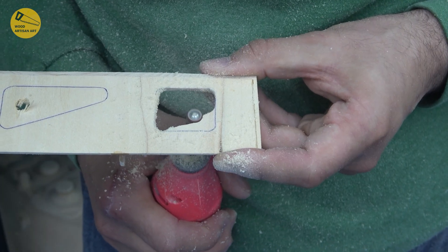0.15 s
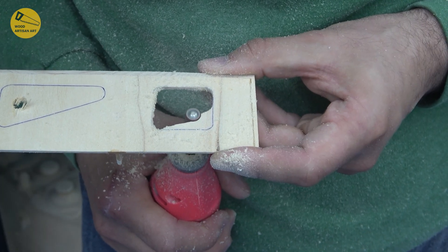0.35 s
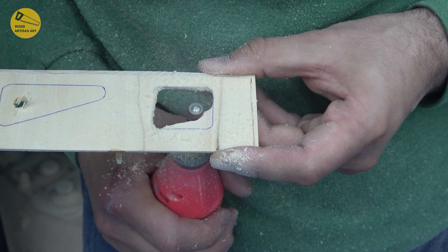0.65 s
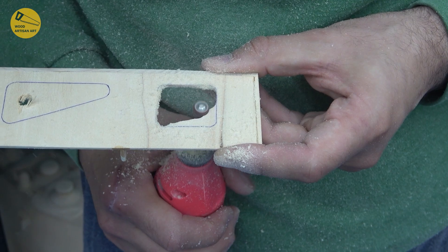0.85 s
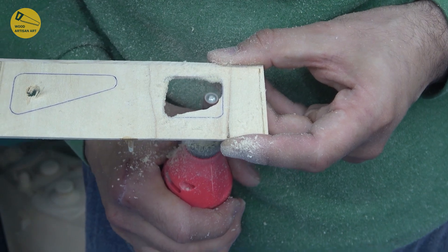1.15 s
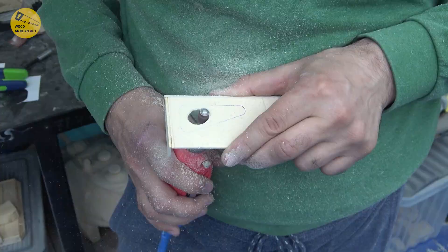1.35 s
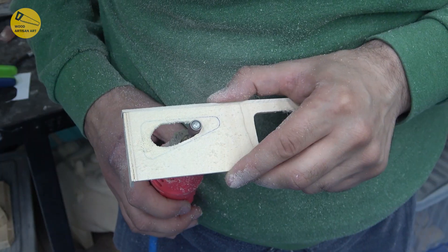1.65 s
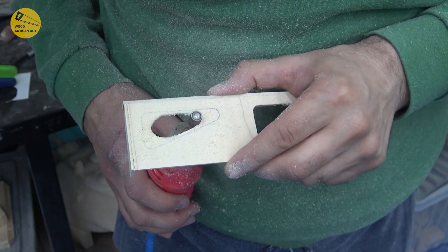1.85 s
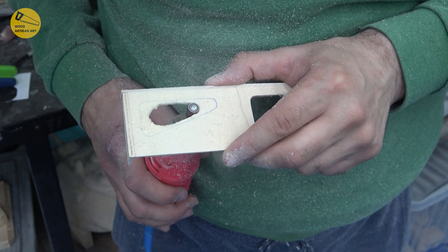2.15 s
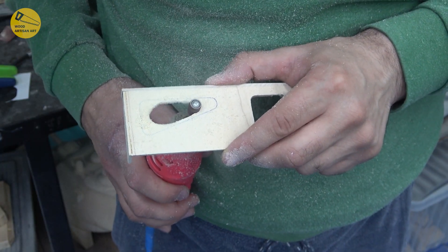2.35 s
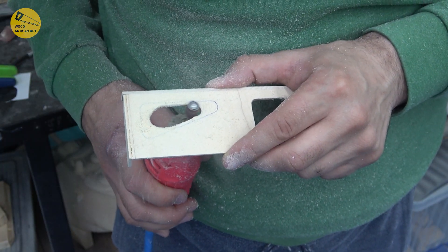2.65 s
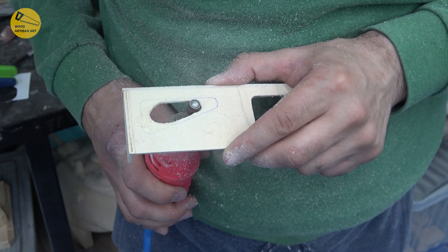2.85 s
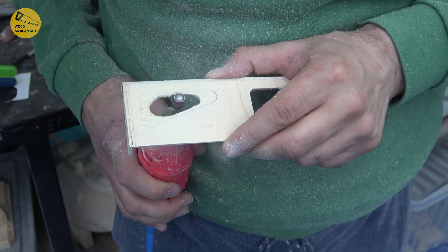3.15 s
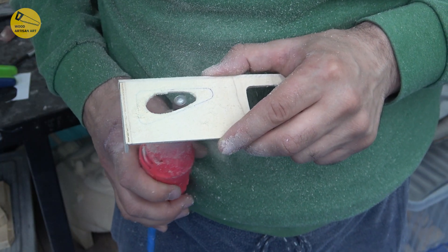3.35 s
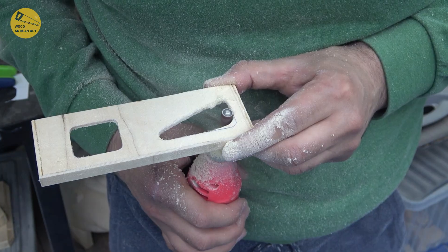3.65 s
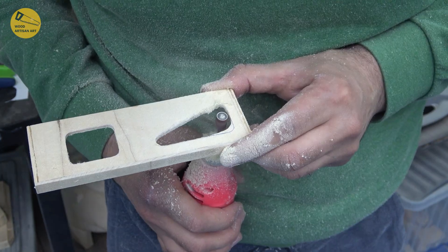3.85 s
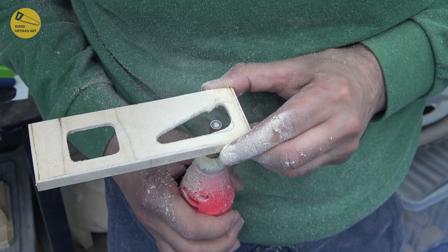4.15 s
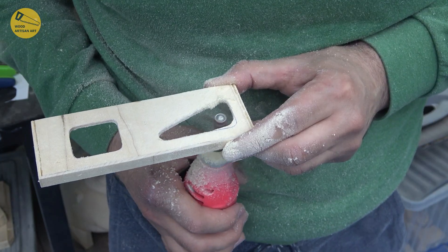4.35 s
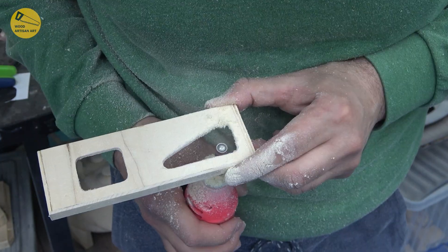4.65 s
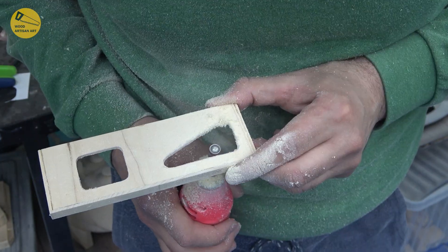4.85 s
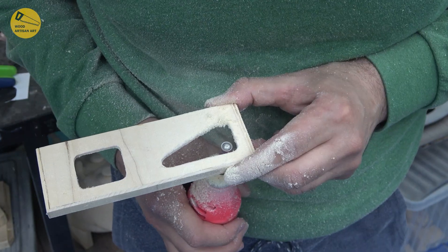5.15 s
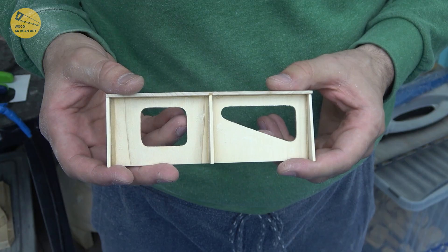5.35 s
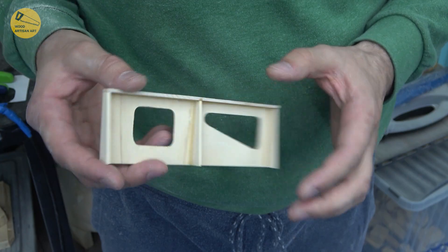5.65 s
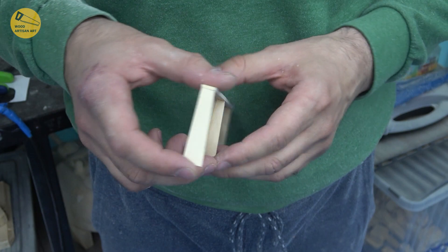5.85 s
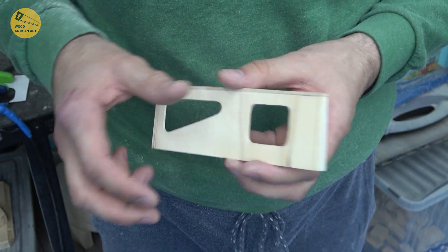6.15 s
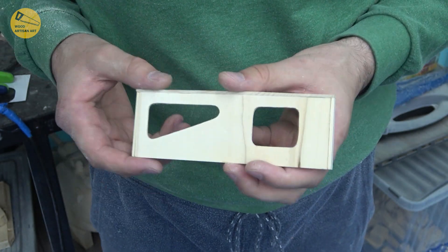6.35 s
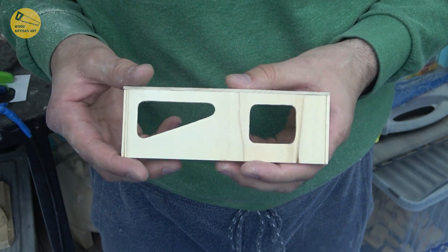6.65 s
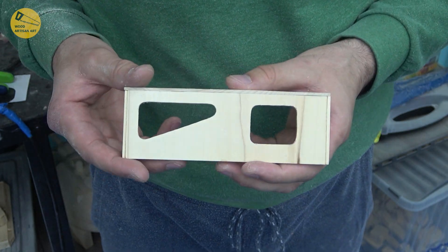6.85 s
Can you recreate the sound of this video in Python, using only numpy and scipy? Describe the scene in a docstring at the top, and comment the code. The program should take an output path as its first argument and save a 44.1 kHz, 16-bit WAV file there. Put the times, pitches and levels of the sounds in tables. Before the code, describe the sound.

Close up, a handheld rotary tool with a small sanding drum grinds the edges of cutouts in thin plywood. The motor whines high and buzzy, sagging when pressed and rising when eased, while grit rasps and the plate chatters and sings. Work jumps abruptly between stretches. Past five seconds it cuts off, leaving quiet workshop air and soft dry finger rustles on hollow wood.

```python
"""A handheld rotary tool runs a small sanding drum round the cutouts of a thin plywood part, in five stretches
that follow abruptly. The motor whines at eight times its speed, chopped by the speed control, and slows under
load; the drum rasps as grit tears fibres, and its bumps chatter on the edge and now and then set the plate singing.
Then the tool is gone, and fingers turn the part over: dry skin slips and the hollow wood rings.
Behind it lies a quiet workshop: a low wash of air, a faint hum and a swelling drone."""
import sys
import numpy as np
from scipy import signal
from scipy.fft import irfft
from scipy.io import wavfile
from scipy.ndimage import map_coordinates

SR = 44100
rng = np.random.default_rng(int(sys.argv[2]) if len(sys.argv) > 2 else 0)


def generate_wav(signal):
    """Clip the signal to [-1, 1] and save it as 16-bit WAV at the path in sys.argv[1]."""
    frames = np.transpose(np.atleast_2d(signal))
    scaled = np.clip(frames, -1, 1) * 32767
    pcm = np.round(scaled).astype(np.int16)
    wavfile.write(sys.argv[1], SR, pcm)


N = 308259
TIME = np.arange(N) / SR   # s
SLOTS, CHOP_HZ = 8, 100   # armature slots; bursts of current per second
FLARE_RISE_S, FLARE_FALL_S = 0.038, 0.013
SING_RISE_S, SING_FALL_S = 0.046, .06
# The stretches of work. Each row: start in seconds, motor whine in dB, shaking of the plate in dB, rasp in dB,
# pitch of the gripped housing in Hz, its width in Hz, housing growl in dB, twitching of the chatter in dB.
STRETCH_ROWS = [(0, -29, 1.5, -1.5, 2550, 204, -1.5, 1.5), (1.434, -44.5, -2, 0, 2560, 300, 3.5, 0.5),
                (1.521, -31, 2.5, 0.5, 2635, 282, -2, 1.3), (3.514, -29, -1, 1, 2603, 227, 0, 2),
                (4.471, -32, -3.5, 1, 2526, 116, 0.5, 0.7)]


def from_db(db):
    """Decibels to gain."""
    return 10 ** (np.asarray(db) / 20)


def rms_one(x):
    """Scale to unit rms."""
    return x / np.sqrt(np.mean(np.abs(x) ** 2) + 1e-20)


def in_time(rows, at=TIME):
    """Each column of a curve, joined by straight lines."""
    s, *columns = np.transpose(rows)
    return [np.interp(at, s, c) for c in columns]


def at_hz(points, hz):
    """Read a spectrum on a log-frequency axis."""
    point_hz, point_db = np.array(points).T
    return np.interp(np.log(hz), np.log(point_hz), point_db)


def held(start, end, rise_s, fall_s, at=TIME):
    """Rise, hold and fall, from 0 to 1 and back."""
    rise = np.clip((at - start) / rise_s + .5, 0, 1)
    fall = np.clip((end - at) / fall_s + .5, 0, 1)
    return rise * fall


def wander(rate, per_s, shape):
    """Smooth chance of spread 1 along the last axis, sampled per_s times a second; rate in Hz."""
    r = np.exp(-2 * np.pi * rate / per_s)
    settling = 600   # samples dropped while the filter settles
    white = rng.standard_normal(shape[:-1] + (shape[-1] + settling,))
    return rms_one(signal.lfilter([1], [1, -2 * r, r * r], white)[..., settling:])


def drift(rate):
    """Smooth chance at every sample, drawn at every 40th and joined by lines."""
    slow = wander(rate, SR / 40, (N // 40 + 2,))
    return np.interp(np.arange(N) / 40, np.arange(len(slow)), slow)


def resonate(x, hz, width_hz):
    """A resonance with gain 1 on top."""
    r = np.exp(-np.pi * width_hz / SR)
    zeros = np.array([1, 0, -1]) * (1 - r * r) / 2
    return signal.lfilter(zeros, [1, -2 * r * np.cos(2 * np.pi * hz / SR), r * r], x)


def noise_bands(spectrum, alike, grain_db):
    """Yields (Hz, stereo band) of grainy noise; 0 dB in the spectrum is the density of unit white noise."""
    grains = rms_one(from_db(grain_db * rng.standard_normal((2, 1, N))))
    white = rng.standard_normal((2, 3, N)) * grains   # two sets, for alternate bands: left, right, common
    edges = np.geomspace(30, 16000, 23)
    for k, (low, high) in enumerate(zip(edges, edges[1:])):
        hz = np.sqrt(low * high)
        shared = np.clip(alike / (1 + hz / 1000), 0, 1)   # the two sides agree most in the bass
        source = np.sqrt(shared) * white[k % 2, 2] + np.sqrt(1 - shared) * white[k % 2, :2]
        band_pass = signal.butter(2, [low, high], "band", fs=SR, output="sos")
        yield hz, from_db(at_hz(spectrum, hz)) * signal.sosfilt(band_pass, source)


def reflections(x, t60, echo_db):
    """Direct sound plus dense early echoes from hands, part and bench, different on each side."""
    t = np.arange(SR // 12) / SR
    echoes = rng.standard_normal((2, len(t))) * from_db(-60 * t / t60) * (t > .001)
    echoes *= from_db(echo_db) / np.sqrt(np.sum(echoes ** 2, axis=1, keepdims=True))
    echoes[:, 0] = 1   # the direct sound
    return signal.fftconvolve(np.atleast_2d(x), echoes, axes=1)[:, :N]


def workshop(room_db=3.5, hum_db=3.0, waver_rad_per_hz=.0025):
    """A low wash of air with a faint wavering hum and a hollow drone that swells now and then."""
    # Each row: time in seconds, level of the air in dB before room_db is added.
    air_level = [(5.3, -72), (5.55, -69), (5.8, -68.5), (5.9, -67), (6.2, -67.5), (6.45, -65.5),
                 (6.6, -67.5), (6.99, -69)]
    # Colour of the air. Each row: frequency in Hz, relative density in dB per Hz.
    air_colour = [(30, -10.5), (65, -6), (110, -7.5), (213, -11), (330, -16.5), (440, -8.5), (560, -14.5),
                  (720, -5.5), (900, -13.5), (1400, -24.5), (2600, -25), (4300, -32), (6200, -24),
                  (13300, -31), (15500, -28)]
    # Each row: hum frequency in Hz, level in dB before hum_db is added.
    hum_tones = [(70, -84), (140, -88), (377, -82), (700, -79), (845, -79)]
    # Each row: start in seconds, end in seconds, drone level in dB.
    drone_swells = [(5.28, 5.406, -75), (5.551, 5.69, -73.5), (5.85, 5.95, -70), (6.329, 6.509, -67)]
    drone_hz, drone_width_hz, drone_fade_s = 687, 75, .04

    bands = noise_bands(air_colour, alike=0.13, grain_db=-2.0)
    air = rms_one(sum(band * from_db(1.3 * drift(6.5)) for hz, band in bands))
    air = air * from_db(in_time(air_level)[0] + room_db)
    hum = 0
    for hz, db in hum_tones:
        phase = 2 * np.pi * hz * TIME + waver_rad_per_hz * hz * drift(5)
        hum = hum + from_db(db + hum_db + 2 * drift(3.3)) * np.sin(phase)
    drone = resonate(rng.standard_normal((2, N)), drone_hz, drone_width_hz)
    drone = rms_one(resonate(drone, drone_hz, drone_width_hz))
    swell = sum(from_db(db) * held(start, end, drone_fade_s, drone_fade_s) for start, end, db in drone_swells)
    return air + hum + drone * swell


def fingers(stick_db=-0.5, stick_rate=110, slips_per_s=900, slip_db=2.0, smooth=0.6):
    """Dry skin catches and slips on dusty wood; the slips ring in the hollow part, its thin walls a little."""
    # Each row: start in seconds, end in seconds, rustle of the skin in dB, ring of the wood in dB.
    strokes_made = [(5.845, 5.905, -62, -76), (6.018, 6.067, -66.5, -69.5), (6.093, 6.16, -74, -70),
                    (6.17, 6.233, -74.5, -75), (6.33, 6.39, -90.5, -83), (6.451, 6.497, -75, -74)]
    # Colour of the brushing skin. Each row: frequency in Hz, relative density in dB per Hz.
    skin_colour = [(1200, -26.5), (1900, -10), (3000, 0), (4500, 0), (7000, 1.5), (11000, -5.5),
                   (15000, -18)]
    # Hollow of the part. Each row: frequency in Hz, relative level in dB.
    hollow_modes = [(2500, -7), (4650, 0), (5400, 0), (6850, 3), (8300, 1), (10450, 3), (11300, -6)]
    # Thin walls. Each row: frequency in Hz, width in Hz, relative level in dB.
    wall_modes = [(1980, 150, 12), (3100, 290, -3), (4680, 130, -10)]
    hollow_width_hz = 310
    rise_s, fall_s = 0.026, 0.049
    holding_db = -80   # fingers that only hold the part rustle faintly too

    hiss = rms_one(sum(band for hz, band in noise_bands(skin_colour, alike=0.36, grain_db=3.0)))
    slip_sizes = rng.choice([-1, 1], N) * from_db(slip_db * rng.standard_normal(N))
    slips = (rng.random(N) < slips_per_s / SR) * slip_sizes
    hollow = sum(from_db(db) * resonate(slips, hz, hollow_width_hz) for hz, db in hollow_modes)
    hollow = rms_one(reflections(hollow, t60=.02, echo_db=3.0))
    rustle = rms_one(hollow + smooth * hiss) * from_db(stick_db * drift(stick_rate))
    ring = rms_one(sum(from_db(db) * resonate(hiss, hz, width_hz) for hz, width_hz, db in wall_modes))
    strokes = 0
    for start, end, rustle_db, ring_db in strokes_made:
        stroke = from_db(rustle_db) * rustle + from_db(ring_db) * ring
        strokes = strokes + stroke * held(start, end, rise_s, fall_s)
    return strokes + from_db(holding_db) * hiss


def joint_thumps(width_hz=260):
    """A soft low thump where one stretch gives way to the next: an impulse through two broad resonances."""
    # Each row: time in seconds, strength in dB, pitch in Hz.
    thumps = [(1.434, -48, 105)]
    out = 0
    for s, db, hz in thumps:
        impulse = from_db(db) * (np.arange(N) == int(s * SR)) + 1e-18   # the tiny offset keeps the filters quick
        out = out + resonate(resonate(impulse, hz, width_hz), hz, width_hz) * SR / width_hz
    return out


def stretch_at(at=TIME):
    """Number of the stretch of work at each moment."""
    return np.searchsorted([row[0] for row in STRETCH_ROWS[1:]], at)


def of_stretch(column, at=TIME):
    """One column of the stretches of work, at each moment."""
    return np.array(STRETCH_ROWS)[stretch_at(at), column]


def spindle_speed(at=TIME):
    """Turns per second, sagging under load and jumping from one stretch of work to the next."""
    # One curve for each stretch. Each row: time in seconds, speed in turns per second.
    square = [(0, 298), (.04, 308.5), (.12, 311), (.28, 309.4), (.48, 305), (.5, 310), (.632, 316),
              (.74, 314.5), (1.22, 296.6), (1.42, 294.2)]
    hard_push = [(1.434, 266.6)]
    wedge = [(1.526, 368.4), (1.887, 374.3), (2.007, 364.8), (2.191, 344.3), (2.555, 289.5), (2.62, 288.9),
             (2.711, 301.3), (2.832, 307.2), (3.189, 314.6), (3.256, 320.9), (3.3, 329.3), (3.383, 332.8),
             (3.512, 331.8)]
    corner = [(3.517, 326.6), (3.592, 329), (3.742, 335.5), (3.8, 336.4), (4.078, 343), (4.249, 349.5),
              (4.31, 344.8), (4.386, 325.9), (4.41, 323), (4.466, 325.7)]
    finish = [(4.466, 328.5), (4.792, 326.4), (5.046, 330.3), (5.128, 330), (5.26, 329.9)]
    curves = [in_time(c, at)[0] for c in (square, hard_push, wedge, corner, finish)]
    return np.choose(stretch_at(at), curves)


def contact(at=TIME):
    """How the drum meets the wood: force, bouncing and brightness, all in dB."""
    # Each row: start in seconds, end in seconds, force in dB above a graze, brightness in dB.
    presses = [(0.06, 0.483, 9, -0.5), (0.55, 1.432, 11.5, 2), (1.435, 1.503, 8, 10),
               (1.497, 1.854, 9.5, 3), (1.864, 2.687, 11, 6.5), (2.68, 3.23, 4.5, 4),
               (3.284, 3.517, 10, -2), (3.52, 4.22, 8.5, -3.5), (4.209, 4.42, 6.5, 9),
               (4.463, 5.306, 4, 4.5)]
    # Each row: start in seconds, end in seconds, rise of the chatter in dB as the drum bounces on the edge.
    bounces = [(0.573, 0.764, 0.5), (2.679, 3.235, 8.5), (3.298, 3.525, 7), (3.583, 3.666, 5),
               (3.73, 3.802, 7.5), (3.856, 3.923, 7), (3.987, 4.043, 5.5), (4.227, 4.31, 6.5),
               (4.326, 4.423, 7), (4.461, 5.303, 6.5)]
    press_rise_s, press_fall_s = 0.031, 0.059
    bounce_rise_s, bounce_fall_s = 0.011, 0.042
    graze_bright_db = -0.5   # brightness of the barely touching drum

    force_db, bright_db = 0, graze_bright_db
    for start, end, press_db, press_bright_db in presses:
        pressing = held(start, end, press_rise_s, press_fall_s, at)
        force_db = force_db + press_db * pressing
        bright_db = bright_db + (press_bright_db - graze_bright_db) * pressing
    bounce_db = sum(db * held(start, end, bounce_rise_s, bounce_fall_s, at) for start, end, db in bounces)
    return force_db, bounce_db, bright_db


def digging(at=TIME):
    """How deep the drum digs in, from 0 to 1: the shaft judders and the motor's brush noise rises."""
    return held(1.93, 2.64, rise_s=.25, fall_s=.08, at=at)


def rasp(turns, rasp_db=1.5, beat=0.24, patchy_db=2.0, skipping=0.14):
    """Grit tears fibres in dense grains, harder on the high side of the drum."""
    # Colour of the tearing. Each row: frequency in Hz, relative density in dB per Hz.
    tearing_colour = [(60, -47), (150, -17.5), (260, -14), (400, -11.5), (550, -5.5), (760, 0), (1100, 3),
                      (1600, 0), (2500, 0), (3600, 4), (5500, -2), (8500, -1), (13000, -9), (15500, -22)]
    graze_db = -42.5   # barely touching drum, before the trims below
    plate_hz, plate_width_hz, plate_db = 6550, 1100, -2.5   # a bright ring of the plate under the rasp
    body_db, loss_per_force, loss_per_bounce = 6.5, 0.73, 0.28   # dB; dB per dB

    force_db, bounce_db, bright_db = contact()
    # the low rasp gives way to force and to bouncing
    body = from_db(body_db - loss_per_force * force_db - loss_per_bounce * bounce_db)
    bright = from_db(bright_db)
    out = 0
    for hz, band in noise_bands(tearing_colour, alike=0.24, grain_db=2.5):
        zone = body if hz < 2000 else bright if hz > 9000 else 1
        out = out + band * zone * from_db(patchy_db * drift(13.0))
    out = out + from_db(plate_db) * resonate(out, plate_hz, plate_width_hz)
    level_db = graze_db + of_stretch(3) + force_db + rasp_db
    level_db = level_db - skipping * bounce_db   # a bouncing drum spends less time in the wood
    return out * from_db(level_db) * (1 + beat * np.cos(2 * np.pi * turns))


def plate_singing(size, roughness, spread, hz, when):
    """The plate catches the multiple nearest one of its own pitches and sings; changes the arrays in place."""
    # Each row: start in seconds, end in seconds, pitch in Hz, level in dB before twitching,
    # roughness 0-1, swell from ends to middle in dB.
    songs = [(0.0949, 0.29, 1550, -41, 0.8, 1), (.06, 0.36, 3100, -37.5, 0.4, 0.5),
             (.56, 0.777, 1580, -34, 0.5, 0), (.62, 0.72, 1890, -32.5, .3, 5),
             (0.62, 0.82, 3790, -39, 0.3, 3.5), (1.04, 1.5, 3280, -39, 0.53, -6),
             (1.16, 1.425, 2950, -34.5, 0.2, -2), (1.23, 1.5, 580, -42.5, 0, 5),
             (0.94, 1.43, 300, -58, 0.4, -1), (1.56, 2.3, 370, -46.5, 0.8, 5),
             (1.51, 2.15, 740, -41.5, 0.35, -2.5), (1.83, 2.05, 1110, -35, 0.51, 9),
             (1.9, 2.167, 2200, -35.5, 0.94, -4), (1.68, 1.9, 3700, -39.5, 0.3, -3),
             (1.5, 1.8, 5530, -42, 0.1, 3), (2.15, 2.25, 2050, -37.5, 0.85, -1),
             (2.14, 2.4, 2300, -38, 0.9, 3), (2.23, 2.47, 950, -33.5, 0.61, 2.5),
             (2.43, 2.66, 290, -53, 0.85, 4), (1.9, 3.2, 590, -50.5, 0.3, -3),
             (2.44, 2.6, 2080, -37.5, 0.76, -1), (2.9, 3.235, 930, -36, 0.07, -4),
             (2.745, 3.18, 2170, -26.5, 0.4, 10), (2.9, 3.04, 3410, -34, .4, 3),
             (3.0, 3.13, 3120, -33, .4, 6), (3.03, 3.14, 3750, -32, 0.3, 3),
             (2.94, 3.11, 4990, -33.5, 0.3, 3.5), (3.31, 3.48, 6640, -35, .4, 0.5),
             (3.27, 3.52, 335, -59, .4, 1.5), (3.52, 3.72, 330, -57, 0.3, 2),
             (3.32, 3.518, 3000, -32, 0.5, -3), (3.36, 3.53, 2000, -36.5, 0.6, 0.5),
             (3.58, 3.904, 2020, -41, 0.6, -5), (3.6, 3.6, 700, -46, .3, -1),
             (4.19, 4.33, 3500, -32.5, 0.4, 7), (4.15, 4.32, 6300, -35.5, 0.2, 3),
             (4.28, 4.42, 7000, -30.5, 0.4, 3), (4.34, 4.41, 4230, -38, 0.5, 4),
             (4.297, 4.44, 2300, -38.5, 0.3, -1), (4.32, 4.44, 980, -35, 0.33, 3),
             (4.45, 4.65, 980, -40, .4, -2), (4.72, 5.29, 980, -43, 0.32, 4.5),
             (4.44, 4.55, 3270, -30, 0.2, 2), (4.55, 4.86, 3270, -30.5, 0.3, 7.5),
             (4.9, 5.065, 3270, -33.5, 0.6, -1), (4.48, 4.8, 5890, -34.5, 0, 5),
             (4.8, 5.05, 2950, -40.5, 0.5, -1.5), (5, 7, 660, -51, 0.06, 0),
             (4.74, 4.88, 5230, -33, 0.1, 8), (5.6, 6, 6250, -34, .2, 2), (5.08, 5.29, 8230, -37, 0.12, -4),
             (4.747, 5.29, 330, -61.5, 0.3, 4)]
    for start, end, pitch_hz, db, sing_rough, swell_db in songs:
        middle = (start + end) / 2
        nearest = np.argmin(np.abs(hz[:, np.searchsorted(when, middle)] - pitch_hz))
        singing = held(start, end, SING_RISE_S, SING_FALL_S, when)
        singing = singing * (stretch_at(when) == stretch_at(middle))   # stays within its stretch of work
        off_middle = np.clip((2 * when - start - end) / (end - start), -1, 1)
        size[nearest] += singing * (from_db(db - swell_db * off_middle ** 2) - size[nearest])
        spread[nearest] *= 1 - singing / 2   # singing holds its place between the sides
        roughness[nearest] += singing * (np.clip(sing_rough, 0, 1) - roughness[nearest])


def chatter(turns, speed, rough=0.81, rough_rise=0.0099, calming_db=0.5, flicker_rate=32, change_rate=2.7,
            uneven_db=2.5, bright_share=0.16, soft_db_per_octave=1.0, spread_rad=0.68, side_db=1.5, side_rate=9):
    """The drum's bumps hit the edge in a pattern once a turn; the pattern shifts as the contact moves."""
    # Colour for three ways of holding the plate. Each row: frequency in Hz, relative level in dB.
    hold_end = [(1250, -10), (1600, 4), (2000, -2.5), (3000, -7.5), (3800, -8), (4500, -14), (5200, -15),
                (6200, -11.5), (8500, -15), (10500, -19.5), (13000, -18), (15000, -31)]
    hold_middle = [(1250, -14.5), (1600, -0.5), (2000, -1), (2500, -3), (3000, 2.5), (3800, 1), (4500, 1.5),
                   (5200, 2), (6200, 1), (8500, -1), (10500, -7), (13000, -10), (15000, -19)]
    hold_corner = [(1250, 7), (1600, -7.0), (2000, -51), (3000, 4), (3800, -1.5), (4500, 0), (5200, -0.5),
                   (6200, 3.5), (8500, 0), (10500, -4.5), (13000, -4), (15000, -26)]
    # Moments in seconds when the hold changes.
    hold_changes_s = [2.66, 4.46]
    # The out-of-round drum shakes the plate. Each row: multiple of its speed, roughness 0-1.
    lobe_orders = [(1, .6), (2, .5), (3, .5), (4, .8), (5, .7), (6, .65), (7, .6), (10, .55)]
    # For each of these multiples: level in dB before shaking and twitching, dB gained per dB of bouncing.
    lobe_levels = [(-64, -0.52), (-52, -0.22), (-46, 0.64), (-51, -0.3), (-45.5, -0.46), (-47, -0.4),
                   (-47, 0.46), (-44, 0.65)]
    graze_db, per_force = -38.5, 0.3156   # treble level at a graze; dB gained per dB of force
    locking_per_db, twitch_per_s = .035, 9
    soft_above_hz = 6500

    # one column per turn, one row per multiple of the speed
    count = int(turns[-1]) + 2
    when = np.interp(np.arange(count), turns, TIME)
    order = np.arange(1, 50)[:, None]
    hz = order * np.interp(when, TIME, speed)
    shape, per_s = (len(order), count), speed.mean()
    force_db, bounce_db, bright_db = contact(when)

    colours = [at_hz(h, hz) for h in (hold_end, hold_middle, hold_corner)]
    colour_db = np.choose(np.searchsorted(hold_changes_s, when), colours)
    # the wood cushions each knock
    colour_db = colour_db - soft_db_per_octave * np.maximum(np.log2(hz / soft_above_hz), 0)
    colour_db = colour_db + bright_share * bright_db * (hz > 9000)
    size = from_db(colour_db + uneven_db * wander(change_rate, per_s, shape))
    treble = np.sqrt(np.sum(size ** 2 * ((hz > 3200) & (hz < 9000)), axis=0))
    size = size / treble * from_db(graze_db + per_force * force_db + bounce_db)
    # bouncing steadies the pattern; its fine detail repeats less exactly
    roughness = np.clip(rough + rough_rise * order - locking_per_db * bounce_db, 0, 1)
    shake_db = of_stretch(2, when)
    for (k, lobe_rough), (lobe_db, per_bounce) in zip(lobe_orders, lobe_levels):
        size[k - 1] = from_db(lobe_db + shake_db + per_bounce * bounce_db)
        roughness[k - 1] = lobe_rough
    # steady bouncing holds its place between the sides
    spread = spread_rad * from_db(-calming_db * bounce_db) * np.ones(shape)
    plate_singing(size, roughness, spread, hz, when)
    # each tone twitches as the edge slips
    size = size * from_db(of_stretch(7, when) * (wander(twitch_per_s, per_s, shape) - .5))

    # each multiple has a steady part and a part that flickers from turn to turn
    start_phase = rng.uniform(0, 2 * np.pi, order.shape)
    steady = np.exp(1j * (start_phase + 0.81 * wander(change_rate, per_s, shape)))
    flicker = rms_one(wander(flicker_rate, per_s, shape) + 1j * wander(flicker_rate, per_s, shape))
    partials = size * (np.sqrt(1 - roughness ** 2) * steady + roughness * flicker)

    # short waves reach the two sides with different phase and strength
    phase_offset = np.pi / 4 * rng.choice([-1, 1], order.shape) + spread * wander(side_rate, per_s, shape)
    log_gain = np.log(from_db(side_db * wander(2.6, per_s, shape)))
    offset = (1j * phase_offset + log_gain) * np.minimum(hz / 600, 1)
    steps, sides = 1024, []   # points round one turn
    for sign in (1, -1):
        spectrum = np.pad(partials * np.exp(sign * offset), ((1, 0), (0, 0)))
        pattern = irfft(spectrum, steps, axis=0) * steps / np.sqrt(2)
        sides.append(map_coordinates(pattern, [turns % 1 * steps, turns], order=1, mode="grid-wrap"))
    return np.array(sides)


def whine_level(unsteady_db=1.34):
    """The whine holds a level in each stretch and flares or sinks at times; in dB."""
    # Each row: start in seconds, end in seconds, change in dB.
    flares = [(0, .075, 6), (.1, 0.338, 4), (0.393, 0.424, 1.5), (0.478, 0.563, 6.5), (0.58, 0.714, 2.5),
              (0.8, 1.02, -1.5), (1.042, 1.132, 4.5), (1.15, 1.29, -1.5), (1.302, 1.431, 2.5),
              (1.508, 1.702, 3.5), (1.764, 1.98, -0.5), (2.715, 3.222, -4.5), (3.518, 3.613, -0.5),
              (3.7, 4.07, 1.5), (4.088, 4.389, -2), (4.4, 4.465, -2.5), (4.46, 4.87, 0)]
    flares_db = sum(db * held(start, end, FLARE_RISE_S, FLARE_FALL_S) for start, end, db in flares)
    return of_stretch(1) + flares_db + unsteady_db * drift(22)


def whine(phase, fade_rate=5.4, fade_db=1.2, scatter_rad=1.13, scatter_rate=1.79, chop_jitter=0.042,
          smear_rad=.45, leak=0.2, scrape_db=-15, dig_scrape_db=4):
    """Chopped current splits the slot tone into a comb of lines; the housing lifts those nearest its pitch."""
    # Lines one chopping rate apart, slot tone in the middle: relative level of each in dB.
    comb_db = [-23, -18, -12.5, -8.5, -5.5, -1, -3.5, -6.5, -12.5, -16.5, -21]
    # A tighter grip raises the housing's pitch. Each row: start in seconds, end in seconds, rise in Hz.
    grip_shifts = [(4.466, 4.863, 65)]
    brushes_hz, brushes_width_hz = 2594, 700   # scraping of the carbon brushes

    step = 10   # the slow parts are worked out at every 10th sample
    at = TIME[::step]
    shape, per_s = (2, len(at)), SR / step
    slot_hz = SLOTS * spindle_speed(at)
    ring_hz, width_hz = of_stretch(4, at), of_stretch(5, at)
    for start, end, rise_hz in grip_shifts:
        ring_hz = ring_hz + rise_hz * held(start, end, FLARE_RISE_S, FLARE_FALL_S, at)
    chop = 2 * np.pi * (CHOP_HZ * at + chop_jitter * wander(25, per_s, at.shape))
    comb = 0
    for n, db in enumerate(comb_db, -(len(comb_db) // 2)):
        off_ring = 2 * (slot_hz + n * CHOP_HZ - ring_hz) / width_hz
        lift = np.sqrt(1 / (1 + off_ring ** 2) + leak ** 2)
        # the moving tool reaches each side by changing paths, so every line fades on its own
        fading = from_db(fade_db * wander(fade_rate, per_s, shape))
        paths = fading * np.exp(1j * scatter_rad * wander(scatter_rate, per_s, shape))
        smeared = np.exp(1j * (n * chop + smear_rad * n * n))   # the housing smears each burst in time
        comb = comb + from_db(db) * lift * paths * smeared
    comb = np.array([np.interp(TIME, at, side) for side in comb])
    lines = np.real(comb * np.exp(1j * phase) * [[1 + 1j], [1 - 1j]])   # a quarter cycle between the sides
    brushes = resonate(rng.standard_normal((2, N)), brushes_hz, brushes_width_hz)
    brushes = rms_one(resonate(brushes, brushes_hz, brushes_width_hz))
    return from_db(whine_level()) * (lines + from_db(scrape_db + dig_scrape_db * digging()) * brushes)


def motor(turns, firing=.47, chop_jitter=0.0557, depth=0.81, buzz_db=-0.5, sway_rad=0.9, air=1.06,
          wobble_rad=0.029, wobble_per_db=0.4):
    """Armature slots sing while the speed control lets current through, late in each mains half-cycle."""
    # Weaker tones. Each row: multiple of the speed, level in dB before buzz_db is added.
    buzz_tones = [(2, -57), (16, -47.5)]
    # Other parts of the housing that the chopped current rings.
    # Each row: multiple of the speed, resonance in Hz, width in Hz, level in dB before the stretch's growl.
    housing_modes = [(4, 1410, 360, -47), (12, 4400, 870, -45)]
    bearing_order, bearing_db = 3.39, -38   # a bearing hums briefly between two multiples of the speed

    cycle = (CHOP_HZ * TIME + chop_jitter * drift(25)) % 1
    current = np.sin(np.pi * cycle) * np.clip((cycle - firing) * 10, 0, 1)
    force = rms_one(current * depth + 1 - depth)
    # the moving tool reaches each side by changing paths
    sway = sway_rad * np.array([drift(3.3), drift(1.18)]) + [[np.pi / 2], [0]]
    # the harder the push, the less evenly the shaft turns
    wobble = wobble_rad * from_db(wobble_per_db * contact()[0]) * drift(69)
    angle = 2 * np.pi * turns
    buzz = 0
    for k, db in buzz_tones:
        buzz = buzz + from_db(db + buzz_db + 0.77 * drift(2.3)) * np.sin(k * angle + sway * np.cos(k))
    cooling = rng.standard_normal((2, N))   # air from the fan blows through the same cavities
    growl = 0
    for k, hz, width_hz, db in housing_modes:
        tone = force * np.sin(k * angle + sway + wobble)
        breath = air * rms_one(resonate(cooling, hz, width_hz))
        growl = growl + from_db(db) * rms_one(resonate(tone + breath, hz, width_hz))
    bearing = from_db(bearing_db) * held(1.3, 1.9, SING_RISE_S, SING_FALL_S)
    bearing = bearing * np.sin(bearing_order * angle + sway)
    return whine(SLOTS * angle + wobble) + force * buzz + bearing + growl * from_db(of_stretch(6))


def scene(flutter=0.0018, judder_turns=.01, tool_end_s=5.274, tool_pan_db=0.34, room_pan_db=0.8):
    """One spindle drives whine, rasp and chatter; all stop together."""
    speed = spindle_speed() * (1 + flutter * drift(30))
    turns = np.cumsum(speed) / SR + judder_turns * digging() * drift(70)
    running = np.clip((tool_end_s - TIME) / 0.013 + .5, 0, 1)
    tool = (motor(turns) + rasp(turns) + chatter(turns, speed)) * running + joint_thumps()
    sides = np.array([[1], [-1]])   # left a little louder, right a little softer
    return tool * from_db(tool_pan_db * sides) + (fingers() + workshop()) * from_db(room_pan_db * sides)


def record(dry):
    """The top is cut steeply above 15750 Hz."""
    return signal.sosfilt(signal.ellip(12, .1, 90, 15750, fs=SR, output="sos"), dry)


dry = scene()
out = record(dry)
generate_wav(out)
```